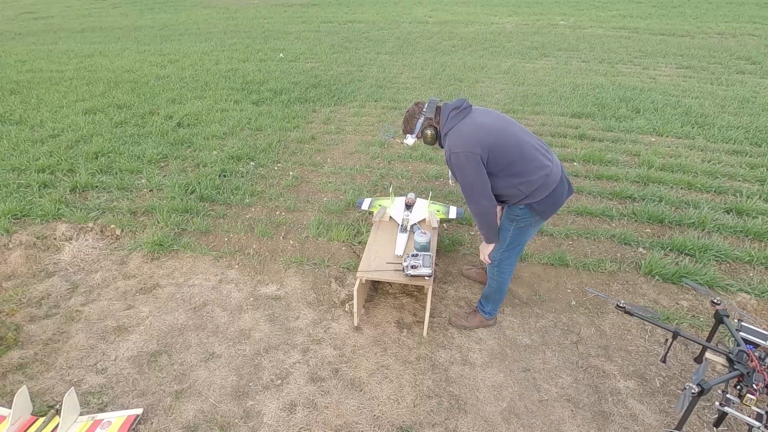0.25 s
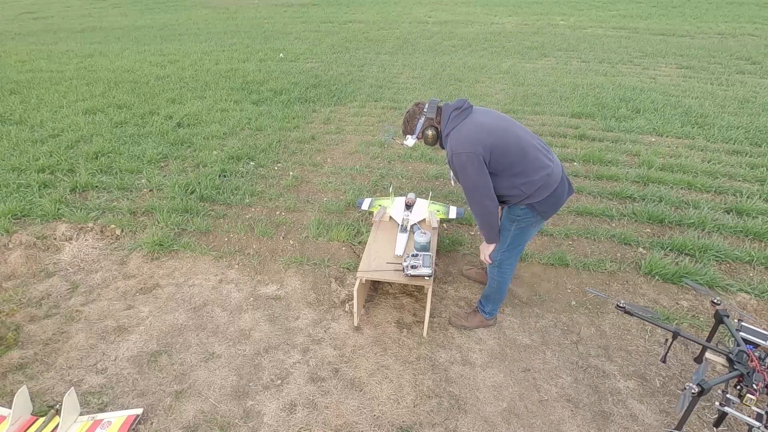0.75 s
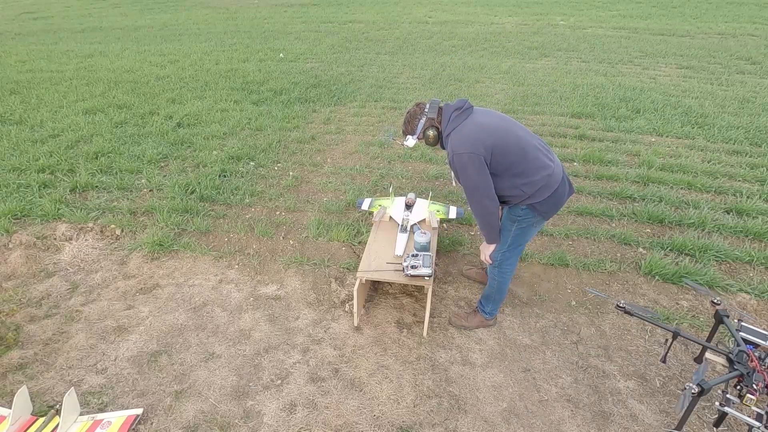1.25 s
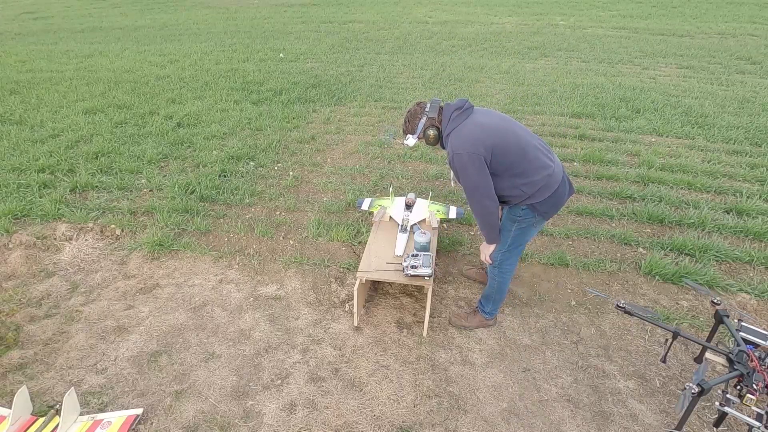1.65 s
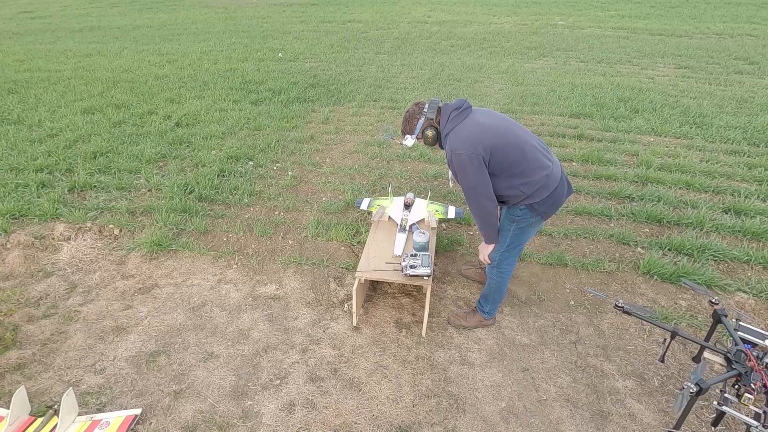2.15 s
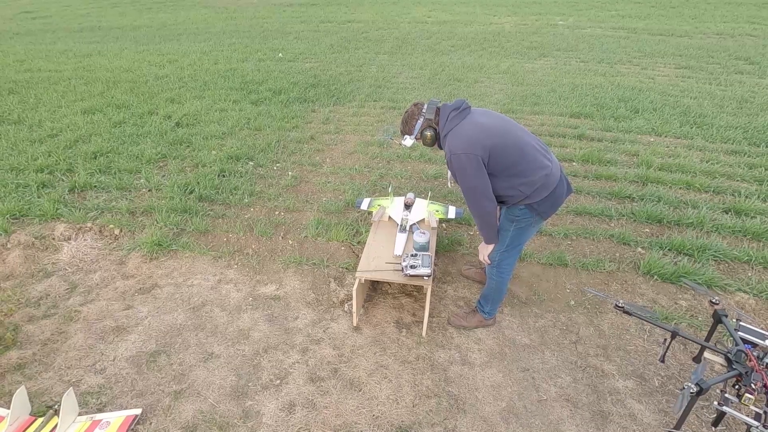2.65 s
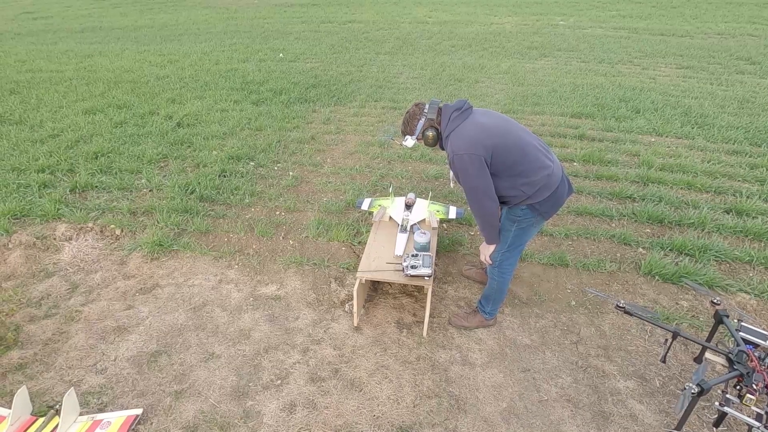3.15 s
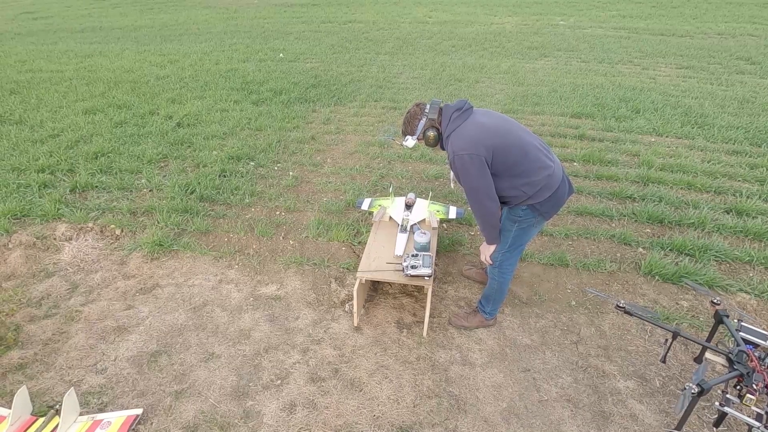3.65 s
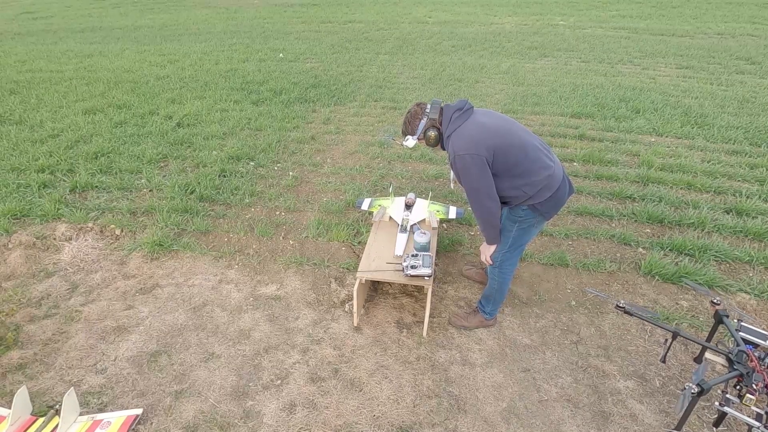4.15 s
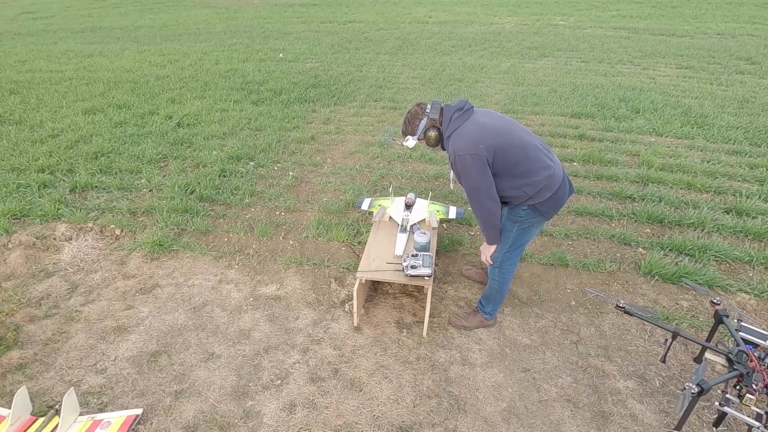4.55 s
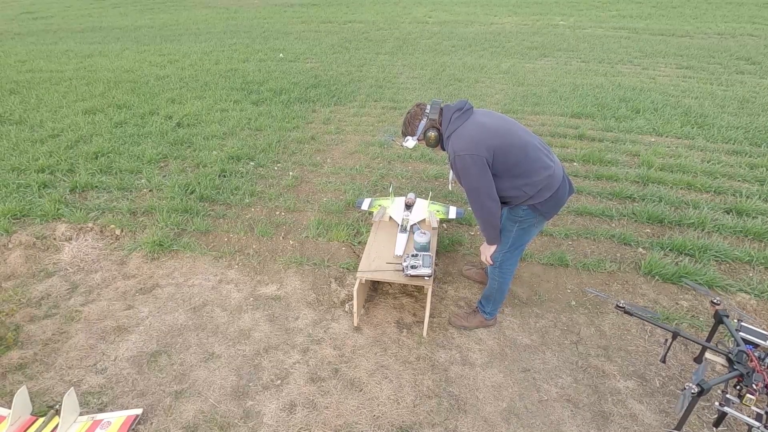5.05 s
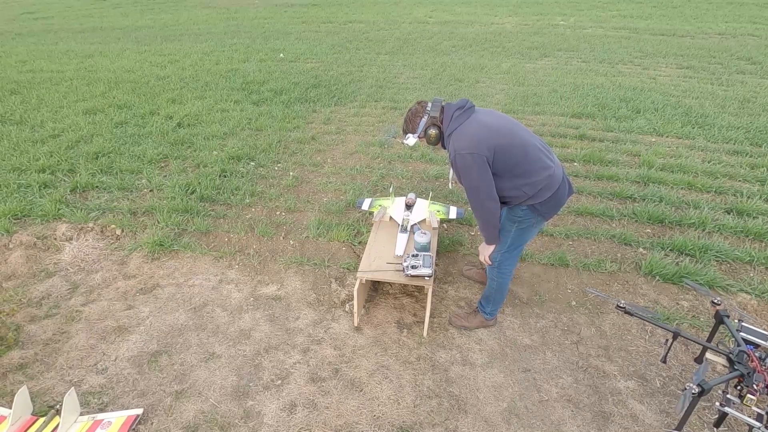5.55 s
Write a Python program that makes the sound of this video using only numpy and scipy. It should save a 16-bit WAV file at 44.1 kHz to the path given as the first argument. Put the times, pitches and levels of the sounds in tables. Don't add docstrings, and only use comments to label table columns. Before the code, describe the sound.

A small jet turbine spools up on a stand in an open field, captured a few metres away by a camera with two microphone ports; the sound is dry and fairly narrow. From 0 s a turbulent exhaust roars and hisses unevenly, with a low rumble beneath. A fuel pump buzzes faintly, strongest near 0.8 s and gone by 1.4 s. Two stand panels hum at a wavering mid pitch, swelling and sinking, then fading from about 2 to 3 s. Meanwhile the roar fills out and the rush and hiss brighten. A thin whine climbs smoothly from around 3 kHz, becoming clear after 4 s, then surging from 4.7 s to a piercing lead near 8 kHz at the end, with faint overtones and a weak lower shaft tone. A very faint high tone slides downward against it. Soft low puffs of breeze thump the microphones irregularly throughout. It ends at 5.8 s, still rising.

```python
import sys
import numpy as np
from scipy import signal
from scipy.fft import rfft, irfft, next_fast_len
from scipy.io import wavfile
from scipy.ndimage import uniform_filter1d

SR = 44100
rng = np.random.default_rng(int(sys.argv[2]) if len(sys.argv) > 2 else 0)


def nominal_scale(level):
    x = np.asarray(level, float) / 20
    return 10 ** x


def dump(signal):
    limited = np.clip(np.atleast_2d(signal).T, -1, 1)
    pcm = np.round(limited * 32767).astype(np.int16)
    wavfile.write(sys.argv[1], SR, pcm)


N = 255339
T = np.arange(N) / SR
SIZE = next_fast_len(N)
HZ = np.arange(SIZE // 2 + 1) * SR / SIZE
BLADES = 6


def evened(x):
    return x / np.sqrt(np.mean(x ** 2) + 1e-20)


def columns(rows, at):
    key, *rest = np.transpose(rows)
    return [np.interp(at, key, column) for column in rest]


def by_hz(rows):
    log_rows = [(np.log(hz), *rest) for hz, *rest in rows]
    return columns(log_rows, np.log(HZ + 1))


def wander(top_hz, low_hz=3):
    coarse = T[::64]
    waves = 0
    for hz in np.geomspace(low_hz, top_hz, 24):
        waves = waves + np.sin(2 * np.pi * (hz * coarse + rng.random())) / np.sqrt(hz)
    return np.interp(T, coarse, evened(waves))


def tone(hz, db):
    turns = np.cumsum(hz) / SR + rng.random()
    return np.sqrt(2) * nominal_scale(db) * np.sin(2 * np.pi * turns)


# (time [s], speed [Hz])
SHAFT_SPEED = [(0, 488.2), (.5, 525.3), (1.0, 571.5), (1.5, 621.1), (2.0, 675.7), (2.5, 737.7),
               (3.0, 808.5), (3.5, 892.7), (4.0, 988.4), (4.5, 1099.6), (4.75, 1159.7), (4.875, 1194.0),
               (5.0, 1231.7), (5.12, 1267.9), (5.208, 1297.0), (5.4, 1318.6), (5.6, 1342.8), (5.79, 1363.7)]


def shaft():
    log_speed = [(s, np.log(hz)) for s, hz in SHAFT_SPEED]
    return np.exp(columns(log_speed, T)[0])


def through(peaks, hz, floor_db=-110):
    power = nominal_scale(2 * floor_db)
    for middle, half_width, db in peaks:
        fall_db = np.minimum(6 * ((hz - middle) / half_width) ** 2, 90)
        power = power + nominal_scale(2 * (db - fall_db))
    return 10 * np.log10(power)


# (frequency [Hz], level [dB], share in phase [-1..1], share a quarter turn
PORT_DIFFERENCE = [(60, -22, -0.3, -0.1), (200, -29, -0.2, 0.33), (1050, -32.5, 0.046, -0.22),
                   (2600, -26.5, 0.24, -0.21), (4700, -15, 0.65, -0.069), (6340, -19, 0.14, -0.19),
                   (7300, -9, 0.64, -0.8), (8400, -14, 0.17, -1), (11200, -14, 0.015, -.6),
                   (11600, 4.5, -0.54, -0.4), (13500, 0, -0.62, -.2), (15500, -2, -.8, 0)]


def two_ports(total, other):
    level_db, in_phase, early = by_hz(PORT_DIFFERENCE)
    tied = in_phase + 1j * early
    tied = tied / np.maximum(abs(tied), 1)
    free = np.sqrt(np.maximum(1 - abs(tied) ** 2, 0))
    differ = nominal_scale(level_db) * (tied * total + free * other)
    return irfft(np.array([total + differ, total - differ]), SIZE)[:, :N]


def noise(colour):
    total, other = rfft(rng.standard_normal((2, SIZE))) * nominal_scale(by_hz(colour)[0])
    pair = two_ports(total, other)
    return pair / np.std(pair.mean(0))


# (frequency [Hz], density [dB per Hz])
RUMBLE_COLOUR = [(41, -20), (70, -5.5), (160, 0), (202, -2), (240, -12), (310, -60), (530, -120)]
ROAR_SLOW_COLOUR = [(140, -51), (240, -20), (280, -17), (324, -9), (475, -4), (513, -1), (691, -4),
                    (741, 0), (961, -3), (1120, -15.5), (1380, -17.5), (1410, -31), (1500, -29),
                    (1950, -47), (3300, -120)]
ROAR_FAST_COLOUR = [(140, -38), (240, -15), (344, -8), (398, -3), (454, -3), (509, 1.5), (571, -4),
                    (631, -1.5), (747, 0), (812, -7.5), (961, 0), (1100, -11.5), (1270, -9.5), (1370, -15),
                    (1500, -25), (1950, -46), (3300, -120)]
RUSH_SLOW_COLOUR = [(880, -45), (1500, -13.5), (1700, -9), (1850, -3.5), (2250, -5), (2630, -5.5),
                    (3010, 0), (4130, -8), (4520, -19.5), (5400, -22.5), (7020, -64), (11900, -120)]
RUSH_FAST_COLOUR = [(880, -27), (1500, -6), (1880, 5), (2160, -2), (2340, 2), (2620, -0.5), (2950, 4),
                    (3280, 1.5), (3980, -0.5), (4330, -5), (4850, -10), (5400, -29), (7020, -49),
                    (11900, -120)]
HISS_SLOW_COLOUR = [(3180, -14), (5400, -1.5), (6100, -0.5), (7100, -2), (7800, -4), (8600, 0),
                    (9400, -2.5), (10000, -8.5), (11200, -19.5), (12000, -32), (15000, -60), (22000, -120)]
HISS_FAST_COLOUR = [(3180, -21), (4900, -4), (5700, -8), (6300, -0.5), (7100, 1.5), (7700, -5), (8300, -2),
                    (8900, -5), (9700, -10), (11200, -21), (12000, -28), (15000, -60), (22000, -120)]
AIR_COLOUR = [(6820, -34), (11600, -6), (12500, -8), (14200, -9), (15100, -13), (15700, -14)]
# (middle shaft speed [Hz], spread [Hz])
COLOUR_CHANGE = [
    (677, 104),
    (695, 170),
    (1070, 120),
]
# (time [s], level [dB])
BURN = [(0, -30.5), (.3, -30), (.6, -28.5), (1.0, -27.5), (1.2, -25), (1.55, -26.5), (1.75, -24),
        (2.3, -24), (3.05, -24), (3.7, -22), (4.3, -23), (4.85, -24), (5.3, -26), (5.79, -26.5)]
# (level [dB], share of the burn [0-1], slope [dB per octave of speed], bend [dB per octave squared])
GROWTH = [
    (-37, 0.14, 6, -9),
    (-24, 1, -1, 1.5),
    (-32, 0.4, 5.5, -5.5),
    (-40.5, 0.32, 13, -1),
]
GUST_DEPTH = [1, 0.42, 0.34, 0.34]


def jet():
    speed = shaft()
    shared_gust = wander(top_hz=41.1)
    pairs = [(ROAR_SLOW_COLOUR, ROAR_FAST_COLOUR),
             (RUSH_SLOW_COLOUR, RUSH_FAST_COLOUR),
             (HISS_SLOW_COLOUR, HISS_FAST_COLOUR)]
    layers = [noise(RUMBLE_COLOUR)]
    for (middle, spread), (slow, quick) in zip(COLOUR_CHANGE, pairs):
        fast = (1 + np.tanh((speed - middle) / spread)) / 2
        layers.append(np.sqrt(1 - fast) * noise(slow) + np.sqrt(fast) * noise(quick))
    layers[3] = layers[3] + nominal_scale(-20.5) * noise(AIR_COLOUR)
    burn_db = columns(BURN, T)[0] + 24
    octaves = np.log2(speed / 800)
    out = 0
    for layer, (db, share, slope, bend), depth_db in zip(layers, GROWTH, GUST_DEPTH):
        level_db = db + share * burn_db + slope * octaves + bend * octaves ** 2
        gust = 0.8 * shared_gust + 0.69 * wander(top_hz=24.6)
        out = out + layer * nominal_scale(level_db + depth_db * gust)
    return out


# (time [s], level [dB])
HUM_LEVEL = [
    (0, -46),
    (.6, -43.5),
    (1.2, -46),
    (1.9, -44.5),
    (2.4, -49),
    (2.9, -57),
    (3.4, -80),
]


def stand_hum():
    level_db = columns(HUM_LEVEL, T)[0]
    high = tone(1335 + 1.7 * wander(top_hz=13), level_db + 2.0 * wander(top_hz=25))
    low = tone(1070 + 1.4 * wander(top_hz=9.5), level_db - 3 + 2.0 * wander(top_hz=25))
    return high + low


# (time [s], stroke rate [Hz], level [dB])
PUMP_STROKES = [
    (0, 260, -56),
    (.3, 263, -53),
    (.55, 266, -50),
    (.8, 272, -49),
    (1.05, 278, -52),
    (1.4, 287, -62),
]
# (multiple of the stroke rate, level [dB])
PUMP_HARMONICS = [(6, -5), (7, 0), (8, 0), (9, -8)]


def pump():
    rate, level_db = columns(PUMP_STROKES, T)
    rate = rate * (1 + .004 * wander(top_hz=40))
    level_db = level_db + 2.5 * wander(top_hz=14, low_hz=4)
    buzz = 0
    for multiple, db in PUMP_HARMONICS:
        buzz = buzz + tone(multiple * rate, level_db + db + 1.1 * wander(top_hz=22.8, low_hz=4.95))
    end_s = PUMP_STROKES[-1][0]
    return buzz * np.clip((end_s - T) / .2, 0, 1)


# (frequency [Hz], half width [Hz], level [dB])
BLADE_RESONANCES = [(3120, 180, -40.5), (3650, 250, -40.5), (4074, 60, -35.5), (4215, 150, -34),
                    (4425, 220, -34), (4810, 160, -43), (5040, 110, -50), (5700, 190, -33.5),
                    (6370, 230, -27), (6600, 120, -24.5), (6844, 106, -25.5), (7400, 330, -21.5),
                    (7870, 220, -21), (8194, 154, -20.5)]
OCTAVE_RESONANCES = [(5900, 170, -55), (6190, 140, -55), (6830, 210, -53), (7370, 270, -49),
                     (7720, 170, -49), (8000, 130, -49), (8750, 260, -52), (9350, 390, -43),
                     (10200, 460, -47.5), (11320, 250, -47.5), (12180, 300, -47), (13900, 600, -63),
                     (15200, 450, -54), (15680, 90, -56)]
# (order, start [s], end [s], level [dB])
SHAFT_ORDERS = [(1, 4.62, 5.27, -36.5), (1.29, 3.2, 3.8, -42), (1.5, 4.8, 5.15, -47), (2, 4.0, 4.35, -50),
                (2, 4.4, 4.85, -39.5), (2, 5.0, 5.25, -46), (2.5, 2.15, 2.7, -51), (3, 1.15, 1.5, -52),
                (3, 1.9, 2.5, -51), (3, 4.0, 4.45, -47), (3, 4.8, 5.9, -41.5), (9, 3.0, 3.95, -59),
                (9, 3.9, 4.35, -50), (9, 4.3, 5.05, -60), (9, 5.45, 5.9, -61), (12.5, -.1, .6, -67),
                (12.5, 3.2, 3.6, -66), (12.5, 4.0, 4.5, -74), (15, 1.25, 2.2, -61), (15, 2.45, 2.75, -70),
                (15, 2.95, 3.25, -73), (18, .8, 1.1, -78), (18, 1.8, 2.25, -68), (18, 2.85, 3.05, -74),
                (18, 3.2, 3.5, -75), (21, 1.4, 2.0, -74), (21, 2.35, 2.7, -78), (27, -.2, 1.1, -75)]


def whine():
    speed = shaft()
    blade_hz = BLADES * speed
    blade_db = through(BLADE_RESONANCES, blade_hz, floor_db=-60)
    octave_db = through(OCTAVE_RESONANCES, 2 * blade_hz, floor_db=-72)
    flicker_db = np.clip(-.1 * (blade_db + 24), .3, 2.5)
    out = tone(blade_hz, blade_db + flicker_db * wander(top_hz=48.8, low_hz=5))
    out += tone(2 * blade_hz, octave_db - 1 + 1.7 * wander(top_hz=40, low_hz=5))
    for order, start, end, db in SHAFT_ORDERS:
        fade = np.clip(np.minimum(T - start, end - T) / 0.039, 0, 1)
        out += fade * tone(order * speed, db + 1.4 * wander(top_hz=40.4, low_hz=8))
    return out


# (frequency [Hz], half width [Hz], level [dB])
FOLDED_RESONANCES = [(12600, 260, -53), (13350, 250, -72), (13720, 200, -70), (14390, 190, -67),
                     (14950, 220, -73)]


def mirror():
    hz = 24000 - 2 * BLADES * shaft()
    return tone(hz, through(FOLDED_RESONANCES, hz) + 1.5 * wander(top_hz=30, low_hz=5))


# (frequency [Hz], density [dB per Hz])
THUD_COLOUR = [(8.8, -32), (15, 1), (70, -2.5), (91, -21), (150, -120)]
# (time [s], level [dB])
BREEZE_PUFFS = [(.05, -36), (0.419, -38), (.77, -47), (1.4, -43), (1.68, -32.5), (1.84, -31), (2.23, -41),
                (2.47, -39), (2.6, -35), (2.9, -33), (3.35, -33), (3.15, -42), (3.61, -42), (3.82, -37),
                (4.01, -40), (4.29, -49), (4.74, -38), (5.13, -43), (5.42, -32.5), (5.65, -38)]


def breeze():
    rise, fall = 130, 67
    lumps = [db - np.maximum(rise * (s - T), fall * (T - s)) for s, db in BREEZE_PUFFS]
    calm_db = -51
    return noise(THUD_COLOUR) * nominal_scale(np.maximum(np.max(lumps, axis=0), calm_db))


def scene():
    tones = rfft(whine() + pump() + stand_hum(), SIZE)
    return jet() + breeze() + two_ports(tones, -tones) + mirror()


def low_pass(x):
    return signal.sosfilt(signal.butter(12, 17120, fs=SR, output="sos"), x)


# (frequency [Hz], width [Hz], depth [dB])
PORT_NOTCH = (11500, 200, -7)
# (start [s], end [s], share of bands [0-1])
STEREO_SHARE = [(0, .4, .35), (.88, .93, .6), (1.32, 1.44, .7), (1.76, 1.88, .7), (1.97, 2.2, .75),
                (2.92, 3.0, .6), (3.23, 3.28, .6), (3.98, 4.05, .9), (4.17, 4.21, .6), (4.31, 4.37, .3),
                (4.42, 4.55, .12), (4.61, 4.9, .35), (4.9, 5.15, .6), (5.15, 5.9, .95)]
# (low [Hz], high [Hz], share kept [0-1])
NARROW_BAND = (420, 1400, .15)
# (frequency [Hz], before the whine is loud [0-1], after [0-1])
EMPTY_BANDS = [(10000, 0, 0), (10400, .06, .1), (10800, 0, .05), (11200, .02, .1), (11350, .35, .5),
               (11650, .35, .5), (11800, 0, .03), (13200, .02, .1), (14000, .03, .45), (15000, .08, .55),
               (15300, .35, .65), (15800, .5, .75)]
WHINE_GROWS = [4.3, 5.2]


def record(dry):
    sum_and_difference = np.array([dry[0] + dry[1], dry[0] - dry[1]]) / 2
    hz, t, z = signal.stft(sum_and_difference, SR, nperseg=1024)
    middle, width, depth_db = PORT_NOTCH
    z *= nominal_scale(depth_db * np.exp(-((hz - middle) / width) ** 2))[:, None]
    band = (55 * np.log(1 + hz / 4000)).astype(int)
    draws = rng.random((len(t) // 3 + 1, band[-1] + 1, 2))
    chance = np.repeat(draws, 3, axis=0)[:len(t)].T[:, band]
    power = uniform_filter1d(abs(z) ** 2, size=3, axis=1)
    strong = power > 6 * uniform_filter1d(power, size=41, axis=1)
    share = sum(part * (t >= start) * (t < end) for start, end, part in STEREO_SHARE)
    low, high, kept = NARROW_BAND
    narrow = ((hz > low) & (hz < high))[:, None] * (1 - kept) * np.interp(t, WHINE_GROWS, [1, 0])
    strong_late = strong[1] & (t > STEREO_SHARE[-3][0])
    z[1] *= (chance[0] < share * (1 - narrow)) | strong_late | (hz > 11150)[:, None]
    calm, loud = columns(EMPTY_BANDS, hz)
    empty = calm[:, None] + (loud - calm)[:, None] * np.interp(t, WHINE_GROWS, [0, 1])
    z *= ((chance[1] >= empty) | strong.any(0)) & (hz < 15800)[:, None]
    total, differ = signal.istft(z, SR, nperseg=1024)[1][:, :N]
    return low_pass(np.array([total + differ, total - differ]))


dry = scene()
out = record(dry)
dump(out)
```